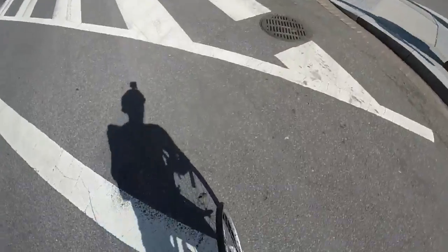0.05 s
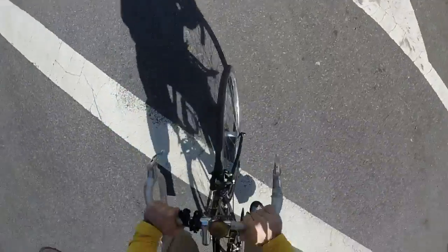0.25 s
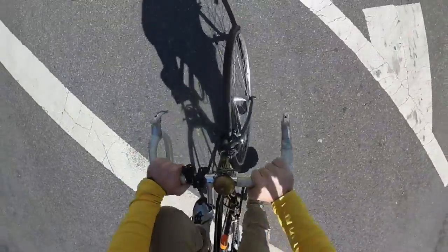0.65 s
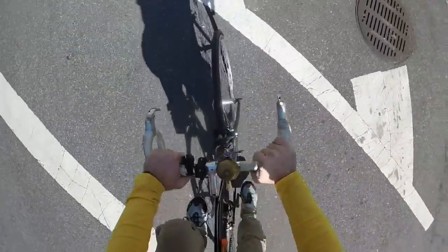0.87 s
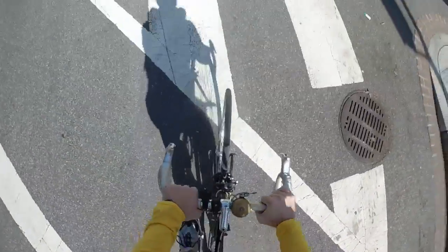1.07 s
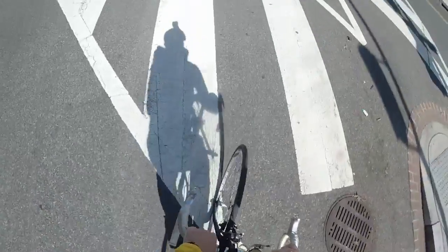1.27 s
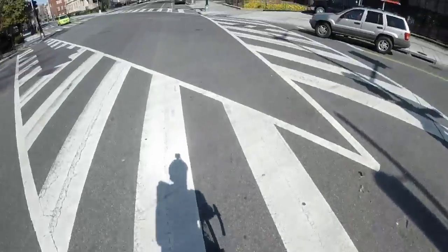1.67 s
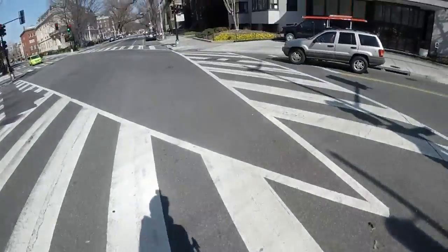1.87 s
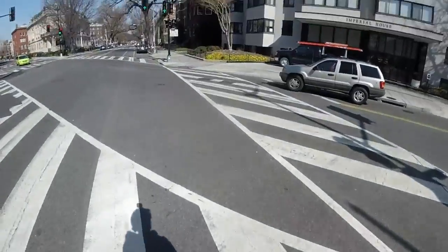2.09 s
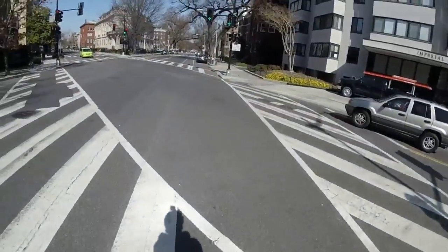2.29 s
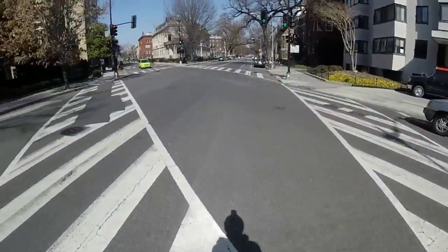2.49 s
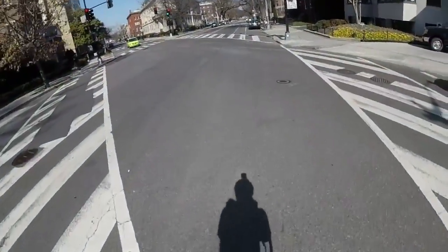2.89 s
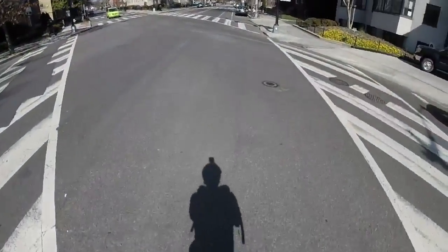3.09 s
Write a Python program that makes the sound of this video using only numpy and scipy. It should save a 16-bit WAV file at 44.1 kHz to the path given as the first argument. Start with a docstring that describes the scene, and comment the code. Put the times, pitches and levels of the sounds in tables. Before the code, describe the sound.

A bicycle pushes off: a shoe knocks twice on the pedal and clicks in, then the chain rattles briefly. Wind rumbles on the rider's microphone over soft tyre noise and faint distant street traffic.

```python
"""A bicycle pushes off

A shoe knocks on the pedal and the cleat snaps in: each impact excites damped modes of the metal.
The chain clatters over ringing sprockets and a brake pad squeaks by stick-slip friction.
The mount of the rider's camera bumps and sways, and turbulent wind rumbles on its microphone
over the wash of tyres and far traffic at a road junction."""
import sys
import numpy as np
from scipy import signal
from scipy.fft import rfft, irfft
from scipy.io import wavfile
from scipy.ndimage import uniform_filter1d

SR = 44100
rng = np.random.default_rng(int(sys.argv[2]) if len(sys.argv) > 2 else 0)


def to_wav(s):
    """Save 16-bit WAV."""
    ch = np.atleast_2d(s).T  # columns
    pcm = np.round(np.clip(ch, -1, 1) * 32767)  # PCM
    wavfile.write(sys.argv[1], SR, pcm.astype(np.int16))


N = 143325
TIME = np.arange(N) / SR


def amp(db):
    """Amplitude ratio of a level in decibels."""
    return 10 ** (np.asarray(db) / 20)


def unit(x):
    """Normalisation to rms 1."""
    return x / np.sqrt(np.mean(x ** 2) + 1e-20)


def colour(spectrum, hz):
    """Spectral level in dB, interpolated over log frequency."""
    f, db = np.transpose(spectrum)
    return np.interp(np.log(hz + 1), np.log(f), db)


def level(points):
    """Amplitude envelope, interpolated in dB."""
    return amp(np.interp(TIME, *np.transpose(points)))


def add(mix, s, sound):
    """Superposition of a sound starting at time s."""
    part = mix[max(round(s * SR), 0):][:len(sound)]
    part += sound[:len(part)]


def cut(x, hz, kind):
    """Second-order low-pass or high-pass filter."""
    return signal.sosfilt(signal.butter(2, min(hz, SR / 2 - 1), kind, fs=SR, output="sos"), x)


def ring(modes, pitch=1, damping=1, rise_s=1 / SR):
    """Free vibration as a sum of damped modes; a soft contact slows the onset."""
    t = np.arange(SR // 4) / SR
    swell = np.sin(np.pi / 2 * np.minimum(t / rise_s, 1)) ** 2
    return swell * sum(amp(db - 60 * t * damping / t60) * np.sin(2 * np.pi * hz * pitch * t)
                       for hz, db, t60 in modes)


def shaped(x, spectrum, tilt_db=0):
    """Filtering by a spectral envelope, tilted by tilt_db per octave."""
    hz = np.fft.rfftfreq(len(x), 1 / SR)
    gain = amp(colour(spectrum, hz) + tilt_db * np.log2(hz / SR + 1e-4))
    return irfft(rfft(x) * gain, len(x))


def drift(count):
    """Band-limited fluctuation of rms 1 through count random values."""
    return unit(signal.resample(rng.standard_normal(count), N))


def wash(spectrum, patch_db, flicker_db):
    """Coloured noise, modulated in time-frequency patches and by a flicker common to all bands."""
    hz, _, frames = signal.stft(rng.standard_normal(N), SR, nperseg=1024, noverlap=768)
    patches = uniform_filter1d(rng.standard_normal(frames.shape), size=12, axis=0)
    patches = unit(uniform_filter1d(patches, size=10, axis=1))
    flicker = rng.standard_normal(frames.shape[1])
    frames *= amp(colour(spectrum, hz)[:, None] + patch_db * patches + flicker_db * flicker)
    return unit(signal.istft(frames, nperseg=1024, noverlap=768)[1][:N])


def bursts(rows, spectrum, rise_s, fall_s, contacts_per_s):
    """Shot noise: runs of tiny random metal contacts swell, hold and decay."""
    out, t = np.zeros(N), np.arange(SR // 4) / SR
    for start, length, db, tilt_db in rows:
        contacts = rng.choice([-1, 1], len(t)) * (rng.random(len(t)) < contacts_per_s / SR)
        envelope = np.minimum(t / rise_s, 1) * np.exp(-np.maximum(t - length, 0) / fall_s)
        run = shaped(contacts, spectrum, tilt_db) * envelope
        add(out, start, amp(db) * unit(run) * np.sqrt(np.mean(envelope ** 2)))
    return out


def street(x):
    """Reverberation: scatter from the ground and house fronts decays exponentially."""
    delay_s, t60_s = 0.0048, 0.2
    t = np.arange(SR // 2) / SR
    scatter = cut(rng.standard_normal(len(t)), 5000, "low")
    tail = scatter * (t > delay_s) * amp(-60 * t / t60_s)
    return amp(-20) * signal.fftconvolve(x, tail / np.linalg.norm(tail))[:N]


def traffic():
    """Far cars radiate broadband tyre roar and a modulated engine tone that sinks in pitch."""
    # engine tone: t/s, f/Hz, level/dB
    engine = [(0, 170.5, -77), (2.0, 172.4, -65), (2.2, 169.8, -70), (2.5, 170, -59), (2.8, 167.9, -62.5),
              (3.0, 160.4, -49), (3.129, 150.5, -60.5), (3.24, 126, -48.5)]
    # envelope of the roar: t/s, level/dB
    roar_level = [(0, -81), (2.0, -79), (2.5, -54.5), (2.63, -52), (2.85, -55), (3.25, -54.5)]
    # spectral density of the roar: f/Hz, relative level/dB
    roar_spectrum = [(180, -20), (265, 5.5), (380, -11.5), (550, -23), (700, 2.5), (860, -6), (1020, 4),
                     (1250, -5), (1500, -1.5), (2500, -13), (6000, -48)]
    s, hz, db = np.transpose(engine)
    phase = 2 * np.pi * np.cumsum(np.interp(TIME, s, hz)) / SR + 0.3 * drift(count=90)
    hum = unit(np.sin(phase) * (1 + 0.3 * drift(count=70)))
    roar = level(roar_level) * wash(roar_spectrum, patch_db=1.5, flicker_db=0.2)
    return amp(np.interp(TIME, s, db)) * hum + roar


def road():
    """Rolling noise of tyres, friction noise of a brush on the asphalt, and a faint steady hiss."""
    # envelopes of rolling and brushing: t/s, level/dB
    rolling_level = [(0, -49), (0.13, -55.5), (0.33, -51.5), (0.5, -54.5), (0.75, -55.5), (0.95, -53.5),
                     (1.14, -51), (1.3, -53), (1.42, -54.5), (1.56, -52), (1.72, -53.5), (1.89, -51.5),
                     (1.97, -54.5), (2.22, -50.5), (2.42, -53.5), (2.65, -53), (3.0, -51.5), (3.25, -50.5)]
    scuff_level = [(0.12, -67), (0.165, -47.5), (0.195, -46.5), (0.24, -49), (0.29, -51), (0.32, -64),
                   (0.355, -42), (0.40, -68)]
    # spectral densities of the three noises: f/Hz, relative level/dB
    rolling_spectrum = [(60, -13.5), (150, 7), (270, 6), (400, -1), (560, -0.5), (700, 0), (850, -5),
                        (1040, 3), (1300, -3.5), (1800, -1), (2300, -5), (2800, -5), (3150, -12),
                        (4000, -15.5), (5600, -20.5), (7000, -28), (10000, -38), (15000, -53)]
    scuff_spectrum = [(200, 1), (650, -6.5), (1050, 4.5), (1700, -0.5), (2700, -4.5), (3700, -17),
                      (5500, -24), (9000, -43), (15000, -44)]
    hiss_spectrum = [(100, 3), (3000, -3), (6000, 0.5), (8500, -4), (12000, -11), (15000, -19)]
    rolling = level(rolling_level) * wash(rolling_spectrum, patch_db=1.15, flicker_db=1)
    scuff = level(scuff_level) * wash(scuff_spectrum, patch_db=1.5, flicker_db=3)
    hiss = amp(-69.5) * unit(shaped(rng.standard_normal(N), hiss_spectrum))
    return rolling + scuff + hiss


def wind():
    """Turbulent pressure fluctuations on the microphone make a gusty rumble."""
    # envelope of the rumble: t/s, relative level/dB
    rumble_level = [(0.0, -37.5), (0.35, -34), (0.86, -38), (1.01, -34), (1.41, -35), (1.58, -38),
                    (1.85, -42.5), (2.15, -30.5), (2.45, -39.5), (2.83, -34.5), (3.15, -43.5),
                    (3.25, -38.5)]
    # spectral density of the rumble: f/Hz, relative level/dB
    rumble_spectrum = [(10, -5.5), (25, 5), (45, -1.5), (76, -4), (95, -13.5), (130, -23.5), (200, -28),
                       (400, -38), (1000, -76.5)]
    gusts = amp(2 + 1.5 * drift(count=50))
    return gusts * level(rumble_level) * unit(shaped(rng.standard_normal(N), rumble_spectrum))


def mount():
    """Bumps excite the hollow modes of the camera mount; jolts sway the microphone in deep pulses."""
    # bumps: t/s, relative level/dB
    bumps = [(0.026, -28.5), (0.211, -30), (0.3666, -0.5), (0.888, -23), (2.15, -30.5), (2.491, -29),
             (2.5102, -29.5), (2.637, -35), (2.956, -28.5), (3.156, -30.5)]
    # modes of the mount: f/Hz, relative level/dB, T60/s
    modes = [(156, -43, 0.2), (266.2, 0, .05), (341, -13, 0.027)]
    # jolts at their peaks: t/s, level/dB, sway f/Hz, 1/e half-width/s
    jolts = [(0.224, -20.5, 64.5, 0.0083), (0.377, -23.5, 40, 0.075), (0.893, -11.5, 58, 0.015),
             (1.067, -17, 53.5, 0.011), (1.131, -22, 24, 0.039), (1.725, -36.5, 128, 0.0081),
             (2.064, -26, 79, 0.016), (2.092, -24, 34.2, 0.053), (2.515, -22, 47.7, 0.0096),
             (2.65, -23, 68, 0.0077)]
    out = np.zeros(N)
    bump = cut(ring(modes, rise_s=0.0058), 197, "high")
    for s, db in bumps:
        add(out, s, amp(db) * bump)
    for s, db, hz, width in jolts:
        t = TIME - s
        out -= amp(db) * np.exp(-(t / width) ** 2) * np.cos(2 * np.pi * hz * t)
    return out


def squeaks():
    """Stick-slip oscillation of a brake pad on the turning rim gives thin harmonic tones."""
    # touches of the pad: t/s, duration/s, f/Hz, relative level/dB
    touches = [(0.3, .088, 3178, -66), (1.756, .088, 3112, -66.5)]
    harmonics_db = [-13, -2, -13.5, -20]
    out, waver = np.zeros(N), 1 + 0.004 * drift(count=900)
    for start, length, hz, db in touches:
        phase = 2 * np.pi * np.cumsum(hz * waver) / SR
        envelope = np.sqrt(np.abs(np.sin(np.pi * np.clip((TIME - start) / length, 0, 1))))
        tone = sum(gain * np.sin(k * phase) for k, gain in enumerate(amp(harmonics_db), 1))
        out += amp(db) * envelope * tone
    return out


def chain():
    """Forced vibration: impacts of the links drive the sprockets, which ring on at resonance."""
    # runs of impacts: t/s, duration/s, level/dB, tilt/(dB per octave)
    clatters = [(1.886, 0.015, -53.5, -1.5), (1.9853, 0.0084, -35, -2), (2.0245, 0.021, -37, -0.3),
                (2.056, 0.03, -51.5, 3.5), (2.0912, 0.0021, -39.5, -0.2), (2.105, 0.14, -59, 0),
                (2.303, 0.0086, -45.5, -4), (2.7035, 0.0097, -40, -3.5)]
    # spectral density of the impacts: f/Hz, relative level/dB
    link_spectrum = [(150, -4.5), (550, -16.5), (780, 4), (1050, -4), (1800, 0.5), (2750, 2.5),
                     (3050, -4.5), (4300, -12), (5600, -5), (6300, -13.5), (7000, -23.5), (10300, -25),
                     (11300, -31), (14000, -29), (16000, -49)]
    # modes of the sprockets: f/Hz, relative level/dB, T60/s
    modes = [(730, -15.5, 0.13), (858, -15.5, 0.1), (1800, -39, .1), (2025, -23, 0.059), (2630, -39, 0.1),
             (2749, -28.5, 0.43), (3360, -30, 0.13), (5090, -29, .14), (5630, -36, .08)]
    links = bursts(clatters, link_spectrum, rise_s=0.002, fall_s=0.0059, contacts_per_s=4000)
    return links + amp(-28.5) * signal.fftconvolve(links, ring(modes))[:N]


def cleat():
    """The cleat scrapes by sliding friction and snaps over its spring catch, exciting a gritty ring."""
    # snaps: t/s, relative level/dB, low-pass f/Hz
    snaps = [(1.017, -31, 5800), (1.0195, -23.5, 9100)]
    # modes of cleat and catch: f/Hz, relative level/dB, T60/s
    modes = [(1460, -0.5, 0.024), (1920, -3, 0.0083), (2360, -0.5, 0.015), (2740, -19, 0.038),
             (3320, -10.5, 0.022), (4090, -9.5, 0.025), (5560, -2.5, .021), (5810, 1, .009),
             (6200, -1, 0.014), (6552, -21, 0.024), (7051, -15, .0125), (7962, -13.5, 0.015),
             (9000, -14, .008), (10370, -11, 0.0089)]
    # scrapes on the pedal: t/s, duration/s, level/dB, tilt/(dB per octave)
    scrapes = [(0.8535, 0.003, -48, 3), (0.8635, 0.0092, -41.5, -.5), (1.032, 0.0091, -44, -3),
               (1.048, .008, -68, -10), (1.0705, 0.0044, -51.5, 1.5)]
    # spectral density of the scrapes: f/Hz, relative level/dB
    scrape_spectrum = [(300, -4), (900, 1.5), (1500, 4.5), (2500, -2), (4200, 1.5), (5000, -7.5),
                       (6600, -2.5), (8500, -21), (12500, -31), (16000, -47)]
    clicks, tone = np.zeros(N), ring(modes, rise_s=0.0001)
    t = np.arange(len(tone)) / SR
    for s, db, bright_hz in snaps:
        grit = amp(-12) * rng.standard_normal(len(t)) * np.exp(-t / 0.0025)
        add(clicks, s, amp(db) * cut(tone + grit, bright_hz, "low"))
    scraping = bursts(scrapes, scrape_spectrum, rise_s=0.0026, fall_s=0.0058, contacts_per_s=3600)
    return cut(clicks, 1410, "high") + scraping


def knocks():
    """Impact excitation: the shoe sets pedal and frame ringing; softer contact gives less treble."""
    # impacts: t/s, relative level/dB, low-pass f/Hz, pitch ratio, damping ratio
    impacts = [(0.3681, -16, 1910, 1.01, 0.77), (0.8895, -17.5, 1870, 1.03, 1),
               (0.9283, -33.5, 1100, 1.0, 0.84), (0.953, -41, 1200, 1.16, 0.98),
               (1.0785, -35.5, 1200, 1.0, .9)]
    # modes of pedal and frame: f/Hz, relative level/dB, T60/s
    modes = [(420, -6.6, 0.051), (701, -9, 0.055), (1050, -7.5, 0.027), (1094, -5.5, 0.023),
             (1192, -2, 0.023), (1380, -20, 0.06), (1630, -3, 0.018), (1774, -7, 0.022), (2060, -14, 0.023),
             (2370, -28, 0.071), (2650, -9, 0.027), (3200, -18, 0.025), (4070, -16, 0.019),
             (5540, -16, 0.013)]
    out = np.zeros(N)
    for s, db, bright_hz, pitch, damping in impacts:
        tone = ring(modes, pitch, damping, rise_s=0.0004)
        add(out, s, amp(db) * cut(tone, bright_hz, "low"))
    return cut(out, 750, "high")


def scene():
    """Superposition of the bicycle's direct sound, its reflections, the wind and the street noise."""
    knock, snap, clatter = knocks(), cleat(), chain()
    echo = street(amp(-18) * knock + snap + amp(5.5) * clatter)
    return (knock + snap + clatter + echo + squeaks() + mount() + wind() + road() + traffic())[None]


def record(dry):
    """Band limiting by a steep linear-phase low-pass filter."""
    edge_hz = 15150
    kernel = signal.firwin(511, edge_hz, window=("kaiser", 9), fs=SR)
    return signal.oaconvolve(dry, kernel[None], "same")


dry = scene()
out = record(dry)
to_wav(out)
```